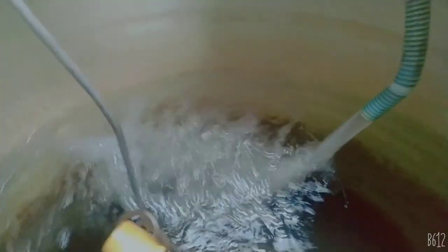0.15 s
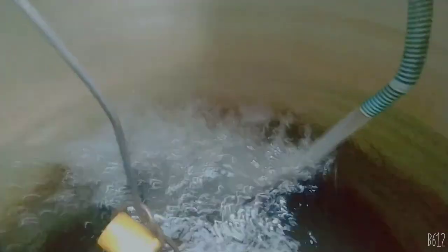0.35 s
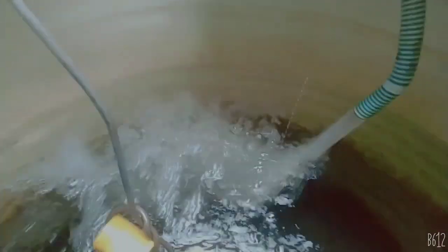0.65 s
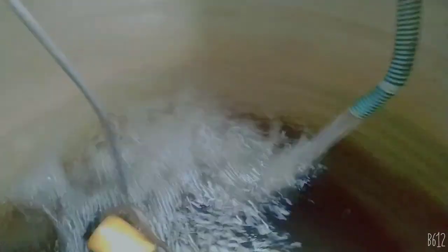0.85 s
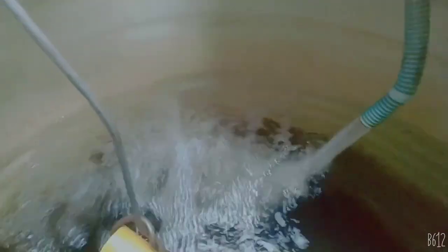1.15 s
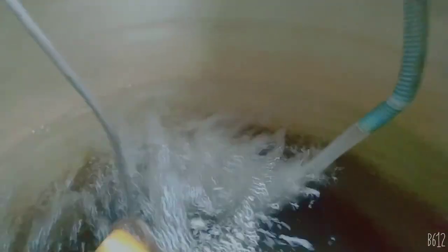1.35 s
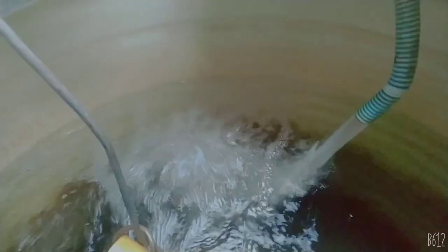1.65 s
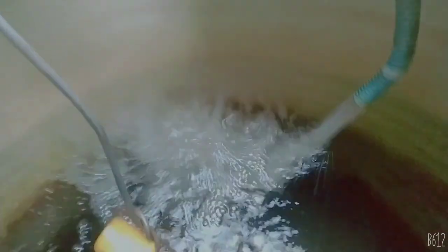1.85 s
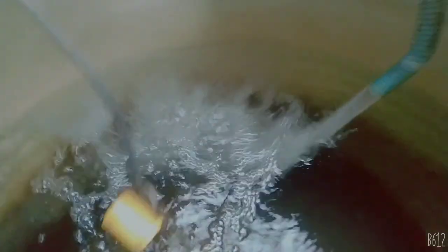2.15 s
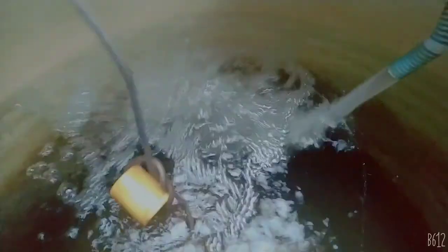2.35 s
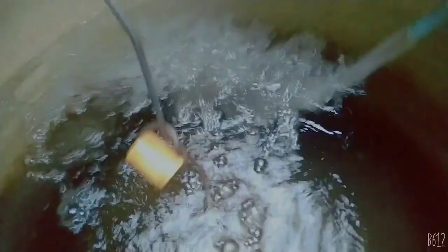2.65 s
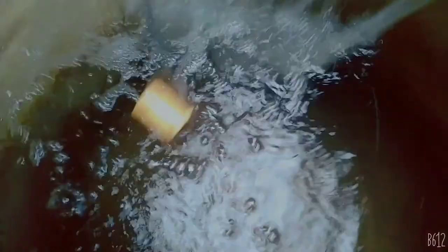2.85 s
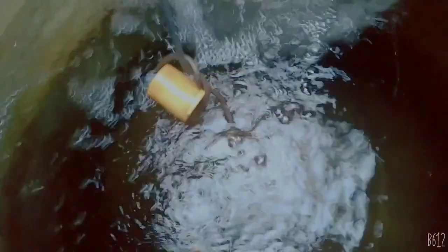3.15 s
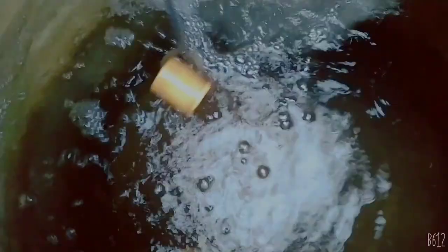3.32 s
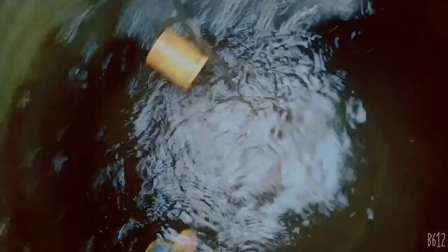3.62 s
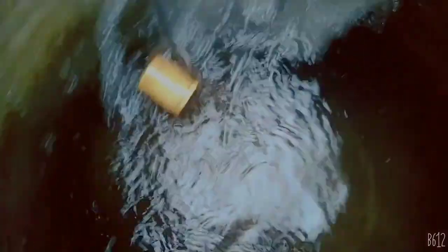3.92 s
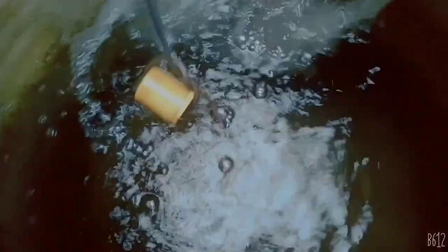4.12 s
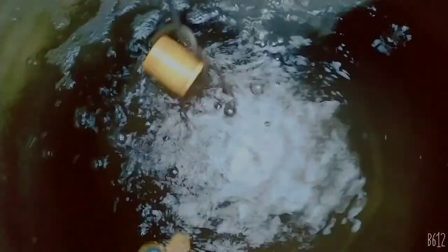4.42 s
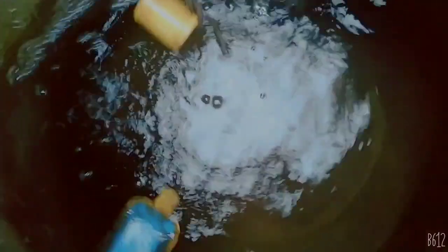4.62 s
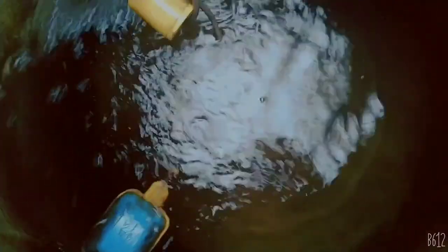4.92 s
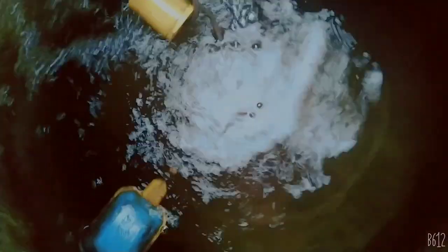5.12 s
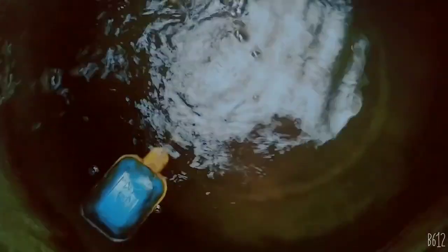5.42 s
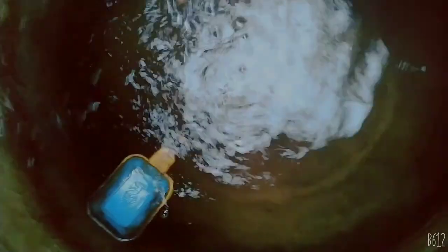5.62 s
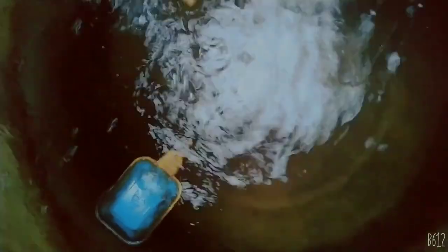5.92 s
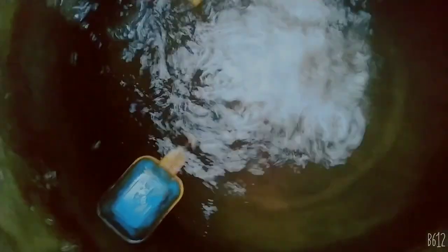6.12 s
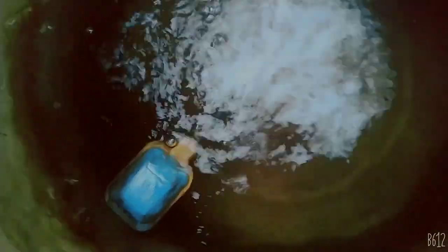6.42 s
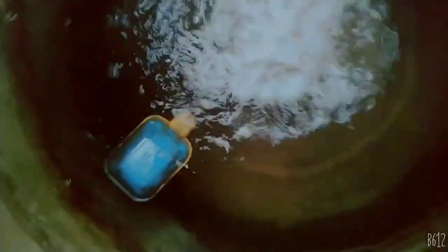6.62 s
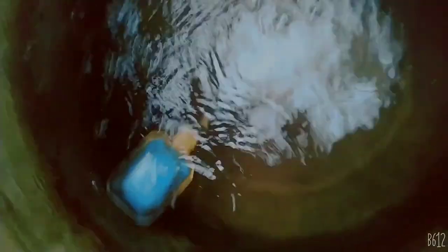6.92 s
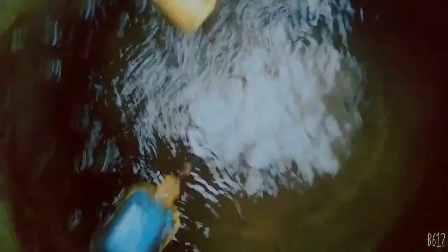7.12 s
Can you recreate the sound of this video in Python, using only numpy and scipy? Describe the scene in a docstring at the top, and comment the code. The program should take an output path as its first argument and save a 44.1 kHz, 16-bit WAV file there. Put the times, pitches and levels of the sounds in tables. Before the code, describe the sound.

Water pours hard from a hose into a part-filled tank: quiet hiss at first, then continuous bright bubbling, splashes and hollow gurgles.

```python
"""Hiss of a hose jet on the wall of a part-filled plastic tank; within a second it plunges into the pool.
Bubbles: thousands of short decaying sines a second, at the pitch of their sizes, in bursts at each plunge.
Spray: clicks and noise, coloured over time. Slosh: duller clicks and noise. Gulps: low sines of sagging pitch.
Standing waves of the tank air colour bubbles and slosh; bloops and a low heave ring near their pitches.
A stray drop ticks on the microphone, which loses the deep bass."""
import sys
import numpy as np
from scipy import signal
from scipy.fft import rfft, irfft
from scipy.io import wavfile
from scipy.ndimage import uniform_filter1d, minimum_filter1d

SR = 44100
rng = np.random.default_rng(int(sys.argv[2]) if len(sys.argv) > 2 else 0)


def put_to_file(sound):
    """Save the sound as 16-bit audio at rate SR, in the file named by the first command-line argument."""
    columns = np.atleast_2d(sound).T  # one column per channel
    safe = np.clip(columns, -1, 1)
    whole_steps = np.round(safe * 32767)
    wavfile.write(sys.argv[1], SR, whole_steps.astype(np.int16))


N = 320166
TIME = np.arange(N) / SR


def gain_of(db):
    """Decibels to amplitude."""
    return 10 ** (np.asarray(db) / 20)


def evened(x):
    """Scales to an rms of one."""
    return x / np.sqrt(np.mean(x ** 2) + 1e-20)


def read(points, hz):
    """A spectrum joined by straight lines on a log-frequency axis."""
    f, value = np.transpose(points)
    return np.interp(np.log(hz + 1), np.log(f + 1), value)


def follow(rows, t):
    """Every column of a curve table at the times t."""
    s, *columns = np.transpose(rows)
    return [np.interp(t, s, c) for c in columns]


def latest(rows, t):
    """The last column of the most recent event at the times t."""
    s, _, value = np.transpose(rows)
    index = np.searchsorted(np.sort(s), t, "right") - 1
    return value[np.maximum(index, 0)]


def add_at(out, s, sound):
    """Mixes a sound into out from the time s, cut at the end."""
    part = out[round(s * SR):][:len(sound)]
    part += sound[:len(part)]


def coloured(x, db_at, size=16384):
    """Minimum-phase filter with the gain db_at(Hz): it rings after each click, never before."""
    log_gain = np.log(gain_of(db_at(abs(np.fft.fftfreq(size, 1 / SR)))))
    spectrum = np.exp(np.conj(signal.hilbert(log_gain)))
    taps = np.fft.ifft(spectrum).real[:size // 2]
    return signal.oaconvolve(x, taps)[:N]


def clicks(per_s, spread_db):
    """Randomly timed impulses of either sign, mostly small, a few large."""
    chance = rng.random(N) * SR / per_s
    at = np.flatnonzero(chance < 1)
    size_db = spread_db * np.minimum(-np.log(chance[at] + 1e-9), 4)
    out = np.zeros(N)
    out[at] = gain_of(size_db) * (-1.) ** at
    return out


def clumps(per_s, spread_db, fade_s, steady):
    """Water lands in lumps: a level that jumps with each one and dies away over a steady power."""
    t = np.arange(SR // 5) / SR
    power = signal.oaconvolve(clicks(per_s, spread_db) ** 2, np.exp(-2 * t / fade_s))[:N]
    return evened(np.sqrt(abs(power) / power.mean() + abs(steady)))


def bursts(rows, rise_s, fade_s):
    """A level that rises fast and dies away at each listed moment."""
    strikes, t = np.zeros(N), np.arange(SR // 3) / SR
    for s, db, *_ in rows:
        strikes[round(s * SR):][:1] += gain_of(db)
    return signal.oaconvolve(strikes, (1 - np.exp(-t / rise_s)) * np.exp(-t / fade_s))[:N]


def drift(per_s):
    """A smooth random wander of rms one."""
    spectrum = rfft(rng.standard_normal(N)) * np.exp(-(np.fft.rfftfreq(N, 1 / SR) / per_s) ** 2)
    return evened(irfft(spectrum, N))


def patches(shape, size):
    """Smooth random spots of rms about one, each size = (bins, frames) large."""
    across_hz = uniform_filter1d(rng.standard_normal(shape), size[0], axis=0)
    spots = uniform_filter1d(across_hz, size[1], axis=1)
    return np.clip(evened(spots), -2, 2)


# lumps of the jet: median rate, log scatter of the gaps, scatter of the weight (clipped at twice this)
MEDIAN_LUMPS_PER_S, LUMP_UNEVEN, LUMP_SPREAD_DB = 11.5, 0.277, 3


def lumps(count=130):
    """The jet breaks into lumps that land at a loose beat: rows of (time [s], weight [dB])."""
    gap, weight = rng.standard_normal((count, 2)).T
    landing_s = np.cumsum(np.exp(LUMP_UNEVEN * gap)) / MEDIAN_LUMPS_PER_S
    return np.transpose([landing_s, LUMP_SPREAD_DB * np.clip(weight, -2, 2)])


def throb(landings, depth, rise_s, fade_s):
    """The level surges with every lump that lands; its rms is one."""
    return evened(1 + depth * bursts(landings, rise_s, fade_s))


# standing waves of the tank air and the hollows between: (centre [Hz], width [Hz], gain [dB])
TANK_MODES = [(223.4, 21, 14), (802, 74, 7.5), (856, 28.5, -17), (903.8, 40, 14), (977, 19, 5.5),
              (1050.6, 31, 14.5), (1201, 13, 10.5), (1274, 18, 9), (1328.5, 32, 15.5), (1423, 14, 10.5),
              (1547, 21, 6), (1692, 15, 9.5), (1749, 38, 12.5), (1772, 21, -19), (1895, 50, 7.5),
              (1987, 27, 6.5), (2035, 40, 1.5), (2070, 24, -7), (2156, 64, 6.5), (2288, 34, 7.5),
              (2307, 24, -11), (2376, 22, -4.5), (2478, 80, 5.5), (2620, 26, -3.5), (2690, 50, 2),
              (2837, 36, 3.5), (3070, 14, 7.5), (3285, 36, 6)]


def tank(x):
    """The air between water and rim rings at its standing waves."""
    return coloured(x, lambda hz: sum(db / (1 + (2 * (hz - f) / width) ** 2) for f, width, db in TANK_MODES))


def rebounds(x, strength=0.13, sway=0.019, count=6):
    """Quick reflections between the tank walls, whose paths sway slowly with the jet."""
    delays_s = np.geomspace(.0013, .009, count)
    swaying = sway * drift(per_s=0.84)
    echoes = [np.interp(TIME - s * (1 + (-1) ** k * swaying), TIME, x) for k, s in enumerate(delays_s)]
    return x + strength * sum(echoes)


# wall echo, ever sooner as the jet shifts: (time [s], first hollow [Hz], echo strength [0-1])
ECHO_HOLLOW = [(0.68, 2000, 0.04), (0.73, 2500, 0.6), (0.77, 3200, 0.2), (0.8, 4050, 0.7),
               (0.83, 5070, 0.8), (0.865, 6540, 0.7), (0.92, 7480, 0.3)]


def wall_echo(x):
    """The splash meets its own dulled echo off the wall, inverted and one cycle late at the hollow."""
    hollow_hz, strength = follow(ECHO_HOLLOW, TIME)
    dulled = uniform_filter1d(x, size=3)
    echo = np.interp(TIME - 1 / hollow_hz, TIME, dulled)
    return (x - strength * echo) / np.hypot(1, strength)


# strength of the pour, before layer trims: (time [s], bubble cloud [dB], spray [dB], sloshing [dB])
POUR_LEVELS = [(0.0, -30.5, -31, -31), (0.13, -39, -32.5, -35), (0.72, -41, -32, -38),
               (0.82, -33.5, -31, -35), (0.95, -25.5, -25.5, -31.5), (1.3, -23, -26, -35),
               (1.75, -22.5, -27.5, -34.5), (2.2, -23.5, -30, -34), (2.6, -23, -29.5, -34),
               (3.05, -19, -28.5, -32.5), (3.75, -22, -29, -34), (4.1, -21.5, -30, -32),
               (4.5, -21, -32.5, -34.5), (5.25, -19.5, -30, -31), (5.55, -19, -30, -30),
               (6.1, -22, -26.5, -32.5), (6.3, -22, -29.5, -33.5), (6.8, -22.5, -27.5, -32),
               (7.26, -20, -26.5, -30)]


def heave(landings, heave_db=-55, hz=215, width_hz=70):
    """Each lump heaves the surface; the deepest standing wave answers, as a surge of low band noise."""
    def mode_db(f):
        return np.maximum(-20 * np.log10(1 + (2 * (f - hz) / width_hz) ** 2), -80)

    hum = coloured(rng.standard_normal(N), mode_db)
    surge = bursts(landings, rise_s=0.027, fade_s=0.029) * gain_of(follow(POUR_LEVELS, TIME)[0])
    return gain_of(heave_db) * evened(hum * surge)


# colour of the slosh ahead of the tank: (frequency [Hz], gain [dB])
SLOSH_COLOUR = [(25, -31), (60, -18), (110, -34), (190, -15.5), (300, -12), (450, -9), (620, 1), (900, -1),
                (1400, 3), (1900, 1.5), (2600, -3.5), (4500, -41.5)]


def slosh(slosh_db=1.36, wash=0.4, roam_db=3.0, roam_above_hz=700, lull_db=2.5):
    """Plops and patter on the heaving surface; as they roam, now one standing wave rings, now another."""
    _, _, level_db = follow(POUR_LEVELS, TIME)
    plops = evened(clicks(per_s=1300, spread_db=3.0)) + wash * rng.standard_normal(N)
    plops *= np.minimum(clumps(per_s=82, spread_db=2.0, fade_s=0.013, steady=0.8), 2)
    hz, t, z = signal.stft(plops, SR, nperseg=512, noverlap=384)
    hz = hz[:, None]
    # deeper plops come in bouts, with lulls between
    bouts = np.interp(t, TIME, drift(per_s=24)) - .5
    z *= gain_of(lull_db * np.exp(-((hz - 480) / 260) ** 2) * bouts)
    z *= gain_of(roam_db * np.minimum(hz / roam_above_hz, 1) * patches(z.shape, size=(3, 30)))
    plops = signal.istft(z, nperseg=512, noverlap=384)[1][:N]
    plops = coloured(plops, lambda f: read(SLOSH_COLOUR, f))
    return gain_of(level_db + slosh_db) * evened(tank(plops))


# large bubbles at a standing wave, before trim and envelope: (time [s], level [dB], pitch [Hz])
BLOOP_EVENTS = [(0.056, -21, 1308), (0.743, -21, 1325), (0.805, -23, 1055), (0.822, -21, 1256),
                (1.846, -18.5, 1354), (2.994, -14.5, 1346), (4.811, -13, 1316), (4.935, -15.5, 1058),
                (5.138, -14, 1353), (5.414, -14, 1040), (5.4818, -15, 1330), (6.009, -14, 1745),
                (6.068, -15, 1342), (6.135, -13, 1345)]


def bloops(bloop_db=-6, rise_s=0.0025, fade_s=0.03, wobble_rad=0.54, wobble_per_s=70):
    """Now and then a large bubble meets a standing wave and rings out, jostled by the churning water."""
    jostle = wobble_rad * drift(wobble_per_s)
    out = np.zeros(N)
    for s, db, hz in BLOOP_EVENTS:
        out += bursts([(s, db)], rise_s, fade_s) * np.sin(2 * np.pi * hz * (TIME - s) + jostle)
    return gain_of(bloop_db) * out


# big air pockets: (time [s], nominal level [dB], settled pitch [Hz], ring t60 [s], churn re level [dB])
GULP_EVENTS = [(0.923, -21, 216, 0.021, -15), (1.0645, -10.5, 222, 0.017, -17), (1.171, -28, 217, 0.03, -2),
               (1.192, -32, 215.5, 0.2, -5), (1.362, -35, 215, 0.12, -3), (1.403, -29.5, 225, 0.17, 1),
               (2.323, -35.5, 206, 0.17, 1), (2.713, -32, 211, 0.2, 0.5), (3.125, -36.5, 225, 0.12, -4),
               (3.660, -35.5, 302, 0.2, -3), (5.309, -30, 295, 0.014, -14),
               (5.652, -25.5, 376, 0.0061, -19), (6.1605, -34, 260, 0.02, -14),
               (6.224, -18.5, 443, 0.009, -22), (6.734, -25.5, 245, 0.012, -13),
               (6.824, -34.5, 300, 0.03, 7)]


def gulps(gulp_db=0.0, sag=0.81, sag_s=0.0027, rise_s=0.0022, churn_s=0.026, rough=0.19,
          lowest_hz=130, churn_low_hz=125, churn_high_hz=500):
    """A big air pocket shuts with a low blup whose pitch sags, and the water churns on after it."""
    out, t = np.zeros(N), np.arange(SR // 4) / SR
    low = signal.butter(2, [churn_low_hz, churn_high_hz], "band", fs=SR, output="sos")
    no_rumble = signal.butter(3, lowest_hz, "high", fs=SR, output="sos")
    for s, db, hz, t60_s, churn_db in GULP_EVENTS:
        turns = np.cumsum(hz * (1 + sag * np.exp(-t / sag_s))) / SR
        level = (1 - np.exp(-(t / (2 * rise_s)) ** 2)) * gain_of(-60 * t / t60_s)
        flutter = 1 + rough * evened(uniform_filter1d(rng.standard_normal(len(t)), size=220))
        ring = level / level.max() * flutter * np.sin(2 * np.pi * turns)
        blup = signal.sosfilt(no_rumble, ring)
        churn = signal.sosfilt(low, rng.standard_normal(len(t)) * np.exp(-t / churn_s))
        add_at(out, s, gain_of(db + gulp_db) * (blup + gain_of(churn_db) * churn / abs(churn).max()))
    return out


# drop on the microphone: (time [s], peak [dB])
MIC_DROP = (6.2285, -0.23)


def stray_drop(tick_s=0.00028):
    """One sharp tick right on the microphone."""
    s, db = MIC_DROP
    age = np.maximum(TIME - s, 0) / tick_s
    return gain_of(db) * (age > 0) * (1 - age) * np.exp(-age)


# sheets slapping down, before trim: (time [s], level [dB], treble tilt about 7500 Hz [dB/octave])
SLAP_EVENTS = [(0.055, -24, 3), (0.624, -24, -1), (0.909, -22.5, -17), (0.974, -25, 0), (1.019, -21, -17),
               (1.068, -21, 2), (1.204, -13, -3), (2.428, -23, -1), (2.593, -23, 4), (2.812, -21, 2),
               (3.058, -16, -2), (3.424, -22.5, 1), (4.424, -24.5, -7), (4.514, -24.3, 15),
               (4.666, -23.5, -8), (5.422, -20, -3), (5.5, -22.5, 1), (5.579, -23.5, 12), (5.83, -21, -8),
               (6.099, -16.5, 1), (6.172, -20, 2), (6.299, -21, 5), (6.438, -21, -5), (6.522, -21.5, 7),
               (6.632, -19, -3.2), (7.113, -22, -0.4)]
# fat drops cracking on the surface, before trim and envelope: (time [s], level [dB])
DROP_EVENTS = [(0.9093, -13), (0.9737, -13), (1.2035, -9.5), (1.3014, -8), (1.4394, -10), (1.4994, -15),
               (1.6094, -15), (2.138, -17), (3.058, -10), (3.3009, -11), (4.1984, -18), (4.4248, -19),
               (4.6703, -20), (5.5792, -15), (6.6328, -11)]
# base colour: (frequency [Hz], gain [dB])
SPRAY_COLOUR = [(400, -42), (1500, -6.5), (2800, 2), (4000, -1), (4700, -2.5), (5800, 0.5), (7200, -1),
                (9000, -1), (10800, -1), (12500, -4.5), (14000, -5.5), (15800, -11)]
# extra colour on the wall at full share: (frequency [Hz], gain [dB])
WALL_COLOUR = [(1500, 0), (2800, 0.4), (4000, 4), (5500, 0), (9000, -2.5), (12000, 0), (15000, 2)]
# share of the wall colour: (time [s], share [0-1])
WALL_SHARE = [(0.75, 0.34), (0.95, 0.011)]
# treble: (time [s], gain around 6200 Hz [dB], slope above 10500 Hz [dB per 3800 Hz])
SPRAY_TREBLE = [(0.0, -1.5, 2.5), (0.7, -2.5, 2), (1.0, -1.5, -1.5), (1.35, -7.5, -3), (1.9, -7, -1),
                (2.3, 2, -3.5), (4.6, 2.5, -2.5), (5.15, 0, 1), (5.6, 2.5, -3), (6.05, -0.5, -1.5),
                (6.65, 4, -2.5), (7.26, -4.5, 0)]
# ridge around 8450 Hz: (time [s], gain [dB])
TREBLE_RIDGE = [(4.3, 0.5), (4.8, 2), (5.4, 2.5), (5.6, 9), (5.9, 0.5)]


def spray(landings, slap_db=1.8, drop_db=-3.5, spray_db=2.0, patchy_db=2.14, broad_db=0.8, mist=0.82):
    """Droplets tick down in clumps over a fine hiss; the mix of coarse and fine drops drifts."""
    steady = gain_of(follow(POUR_LEVELS, TIME)[1] + spray_db)
    steady *= clumps(per_s=40, spread_db=1.5, fade_s=0.013, steady=4.5)
    steady *= throb(landings, depth=0.76, rise_s=0.0018, fade_s=0.014)
    slap = gain_of(slap_db) * bursts(SLAP_EVENTS, rise_s=0.0011, fade_s=0.02)
    crack = gain_of(drop_db) * bursts(DROP_EVENTS, rise_s=0.00047, fade_s=0.0036)
    level = np.sqrt(steady ** 2 + slap ** 2 + crack ** 2)
    drops = rebounds(evened(clicks(per_s=4500, spread_db=2.0)) + mist * rng.standard_normal(N))
    hz, t, z = signal.stft(drops, SR, nperseg=256, noverlap=192)
    hz = hz[:, None]
    coarse_db, fine_db = follow(SPRAY_TREBLE, t)
    field_db = read(SPRAY_COLOUR, hz) + read(WALL_COLOUR, hz) * follow(WALL_SHARE, t)[0]
    field_db += coarse_db * np.exp(-((hz - 6200) / 1500) ** 2)
    field_db += fine_db * np.clip((hz - 10500) / 3800, 0, None)
    field_db += follow(TREBLE_RIDGE, t)[0] * np.exp(-((hz - 8450) / 650) ** 2)
    # a slap tilts the colour by its share of the power, within half an octave
    tilt_db = latest(SLAP_EVENTS, t) * np.interp(t, TIME, slap / level) ** 2
    field_db += tilt_db * np.clip(np.log2((hz + 1) / 7500), -.5, .5)
    field_db += patchy_db * patches(z.shape, size=(4, 20)) + broad_db * patches(z.shape, size=(24, 36))
    hiss = signal.istft(z * gain_of(field_db), SR, nperseg=256, noverlap=192)[1][:N]
    return evened(hiss) * level


def bubble(hz, cycles, chirp):
    """One ringing bubble of unit energy; its pitch creeps up as it nears the surface."""
    turns = hz * np.arange(SR // 16) / SR
    age = turns / cycles
    ring = (1 - np.exp(-4 * age)) * np.exp(-age) * np.sin(2 * np.pi * turns * (1 + chirp * age / 2))
    return ring / np.linalg.norm(ring)


# heaviest lumps, driving bubbles under, before trims: (time [s], level [dB], bubble ring [Hz])
PLUNGE_EVENTS = [(0.962, -15.5, 2570), (0.993, -11, 2220), (1.044, -14, 2800), (1.276, -10, 2790),
                 (1.361, -13.5, 2750), (1.435, -15, 2500), (1.679, -10.5, 2650), (1.723, -15, 2620),
                 (1.754, -14, 2750), (1.786, -12, 2620), (2.065, -7, 2610), (2.254, -15.0, 2640),
                 (2.427, -11.4, 2600), (2.525, -15, 2510), (3.068, -10.5, 2164), (3.184, -16, 2490),
                 (3.284, -11.5, 2570), (3.528, -12, 2640), (3.613, -11, 2760), (3.695, -11.8, 2700),
                 (3.914, -11, 2580), (3.949, -13, 2670), (4.005, -13.5, 2570), (4.052, -11, 2580),
                 (4.161, -9.5, 2670), (4.242, -8, 2290), (4.312, -13, 2450), (4.36, -4.5, 2510),
                 (4.437, -7, 2485), (4.519, -11, 2560), (4.622, -13, 2430), (4.708, -7.5, 2590),
                 (4.823, -11, 2540), (4.974, -15, 2540), (5.056, -19, 2780), (5.183, -8.5, 2600),
                 (5.278, -6, 2320), (5.331, -10, 2740), (5.379, -13, 2450), (5.497, -11, 2430),
                 (5.597, -19, 2770), (5.77, -13, 2520), (5.985, -18, 2630), (6.319, -9, 2920),
                 (6.387, -13, 3030), (6.448, -10, 2720), (6.821, -12, 2570), (6.912, -9.5, 2540),
                 (7.008, -6, 2580), (7.039, -8, 2570), (7.185, -12, 2570)]


def lead_bubbles(lead_db=-5, cycles=16, chirp=0.02, lag_s=0.004):
    """At each plunge one bubble pings out of the cloud, a single decaying sine at the plunge's own pitch."""
    out = np.zeros(N)
    for s, db, hz in PLUNGE_EVENTS:
        ping = bubble(hz, cycles, chirp)
        add_at(out, s + lag_s, gain_of(db + lead_db) * ping / abs(ping).max())
    return out


# moments when the jet breaks up: (time [s], dip [dB])
JET_BREAKS = [(1.56, -9), (2.755, -5.5), (3.10, -3), (4.115, -4.5), (4.40, -2.5), (4.475, -6), (4.697, -9),
              (5.755, -3.5), (6.412, -4), (7.1, -7)]


def breaks(length_s=0.014):
    """The jet breaks up for a moment and drives fewer bubbles under: brief dips as a gain."""
    return gain_of(sum(db * np.exp(-((TIME - s) / length_s) ** 2) for s, db in JET_BREAKS))


# share of each bubble size when the typical one rings at TYPICAL_HZ: (ring [Hz], gain [dB])
BUBBLE_SIZES = [(1400, -20.5), (1800, -9), (2150, -3.5), (2500, 3), (2850, 1.5), (3200, -6), (3600, -12.5),
                (4300, -28.5)]
TYPICAL_HZ = 2553
# typical bubble, by the way the jet enters: (time [s], ring [Hz])
TYPICAL_RING = [(0, 2450), (0.8, 2190), (1.0, 2380), (1.12, 3100), (1.25, 2920), (1.42, 2580), (2.1, 2640),
                (2.7, 2523), (5.4, 2470), (6.15, 2670), (6.4, 2680), (6.75, 2750), (6.9, 2410)]


def bubble_cloud(landings, cycles=8.46, chirp=.015, plunge_db=-3.5, cloud_db=0.44, gurgle=0.023,
                 gurgle_per_s=22, count=30):
    """Thousands of small bubbles a second ring at the pitch of their size; each plunge has its typical size."""
    steady = gain_of(follow(POUR_LEVELS, TIME)[0] + cloud_db)
    steady *= clumps(per_s=170, spread_db=1.65, fade_s=0.016, steady=1.0)
    steady *= throb(landings, depth=0.34, rise_s=0.0023, fade_s=0.018) * breaks()
    plunge = gain_of(plunge_db) * bursts(PLUNGE_EVENTS, rise_s=0.0047, fade_s=0.019)
    level = np.hypot(steady, plunge)
    ring_hz = follow(TYPICAL_RING, TIME)[0] * np.exp(gurgle * drift(gurgle_per_s))
    ring_hz += (plunge / level) ** 2 * (latest(PLUNGE_EVENTS, TIME) - ring_hz)
    cloud = np.zeros(N)
    for hz in np.geomspace(1300, 4500, count):
        # most die at once in the foam; a few in clear water ring on
        brief = evened(clicks(per_s=100, spread_db=2.6))
        clear = .65 * evened(clicks(per_s=10, spread_db=2.8))
        for births, ring in (brief, bubble(hz, cycles, chirp)), (clear, bubble(hz, 4 * cycles, chirp / 2)):
            at = np.flatnonzero(births)
            sizes = np.zeros(N)
            sizes[at] = births[at] * gain_of(read(BUBBLE_SIZES, hz * TYPICAL_HZ / ring_hz[at]))
            cloud += signal.oaconvolve(sizes, ring)[:N]
    return evened(tank(cloud)) * level


def scene():
    """All the water sounds together; drops and small bubbles are too small to make bass."""
    landings = lumps()
    no_bass = signal.butter(3, 450, "high", fs=SR, output="sos")
    splash = signal.sosfilt(no_bass, bubble_cloud(landings) + lead_bubbles() + spray(landings))
    mix = wall_echo(splash) + slosh() + heave(landings) + bloops() + gulps() + stray_drop()
    return mix[None]


EDGE_HZ = 15850


def record(dry, ceiling_db=-7.0, recover_db_per_s=130):
    """A small microphone without deep bass, a quick peak limiter and a steep band limit."""
    thin = signal.sosfilt(signal.butter(2, 105, "high", fs=SR, output="sos"), dry)
    over_db = np.maximum(20 * np.log10(abs(thin[0]) + 1e-9) - ceiling_db, 0)
    recovery_db = recover_db_per_s * TIME
    duck_db = recovery_db - np.maximum.accumulate(over_db + recovery_db)
    # duck slightly ahead of each peak, smoothly
    smooth_db = uniform_filter1d(minimum_filter1d(duck_db, size=89), size=89)
    band_limit = signal.firwin(801, EDGE_HZ, window=("kaiser", 9), fs=SR)
    return signal.oaconvolve(thin * gain_of(smooth_db), band_limit[None], "same")


dry = scene()
out = record(dry)
put_to_file(out)
```